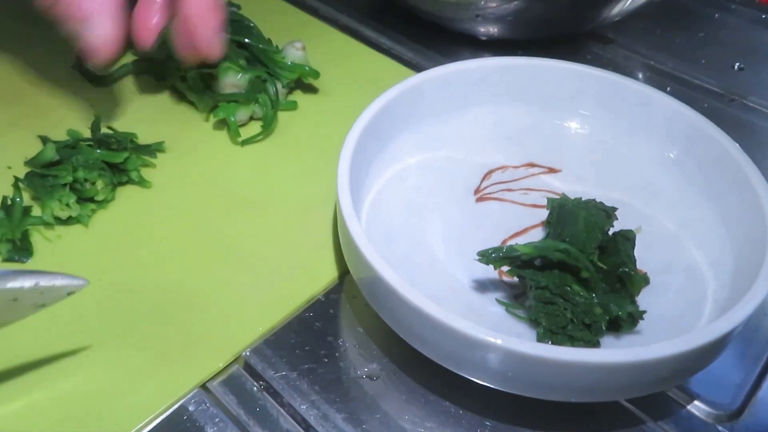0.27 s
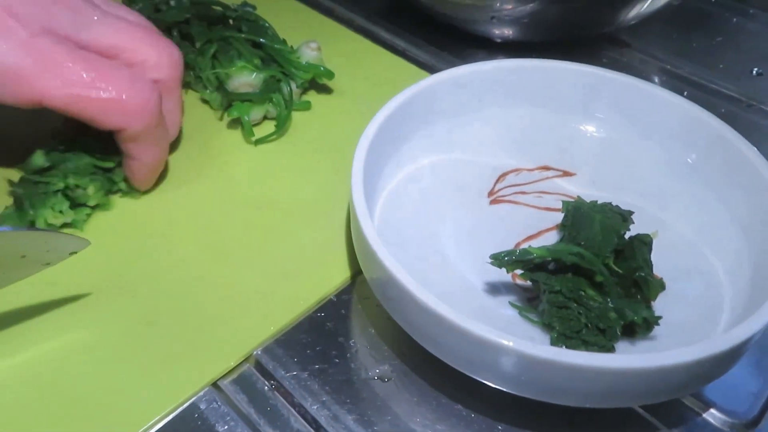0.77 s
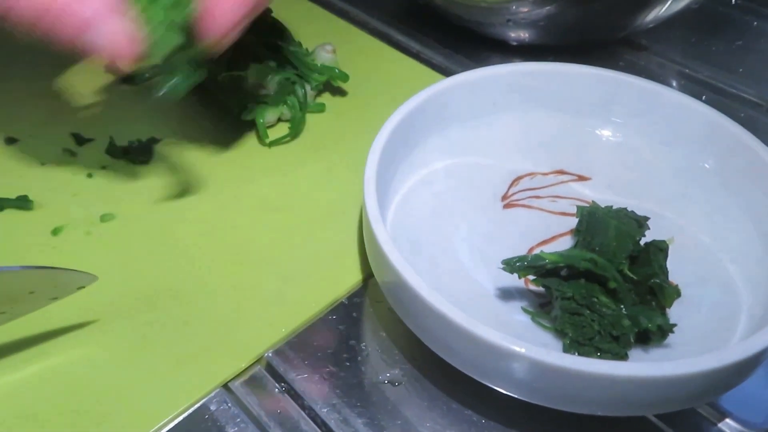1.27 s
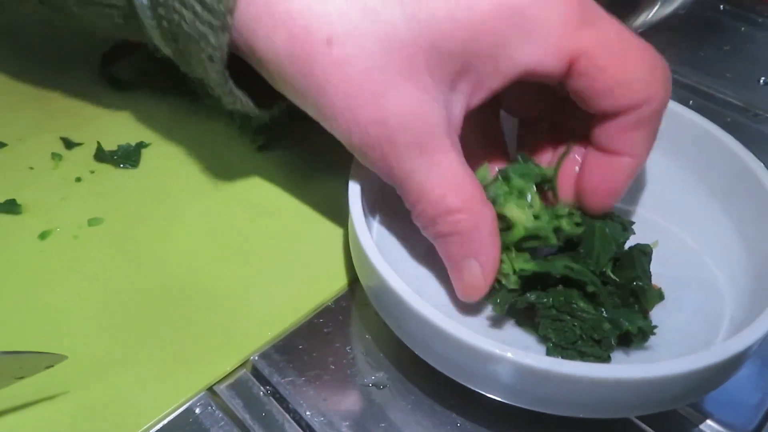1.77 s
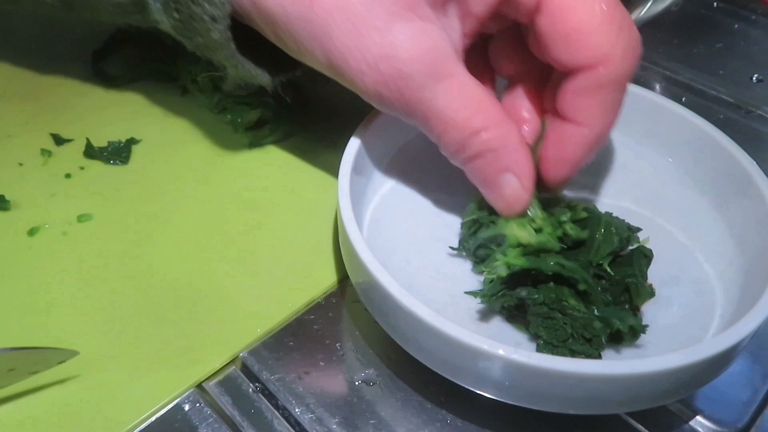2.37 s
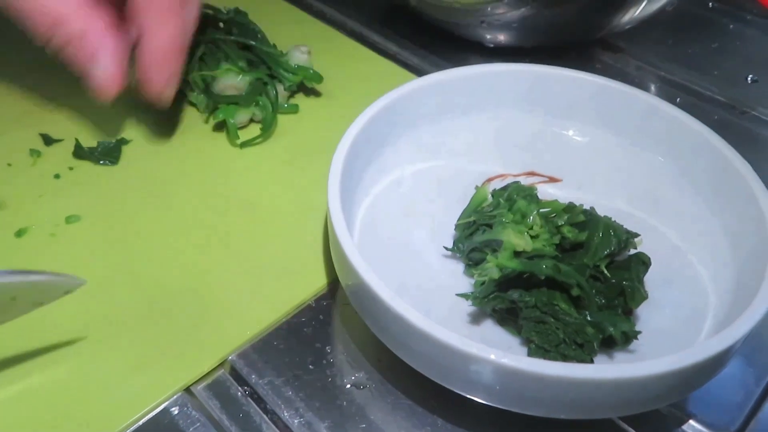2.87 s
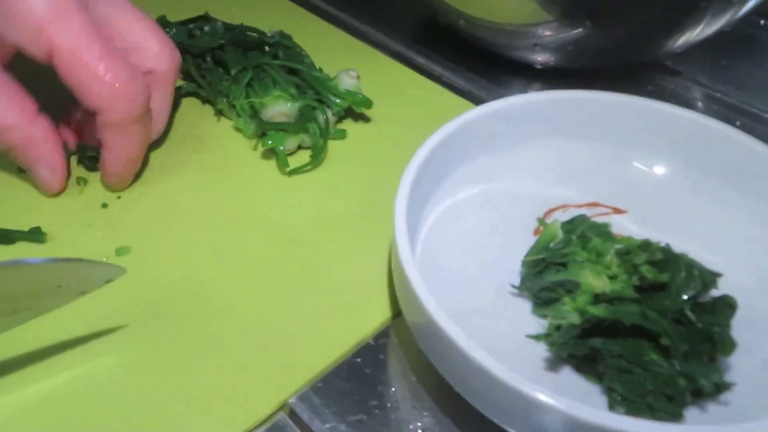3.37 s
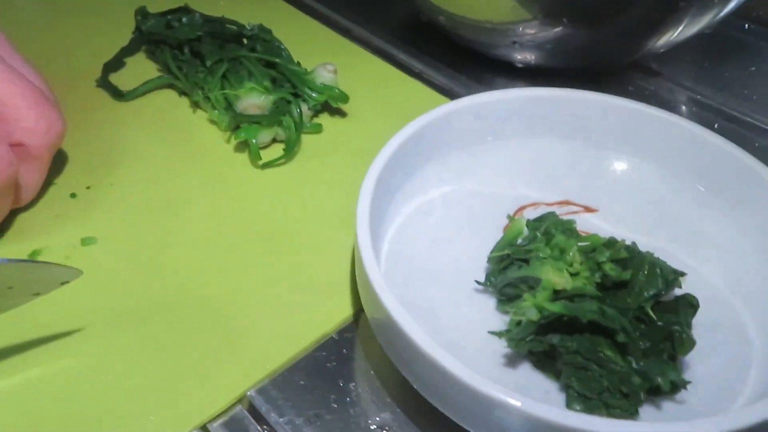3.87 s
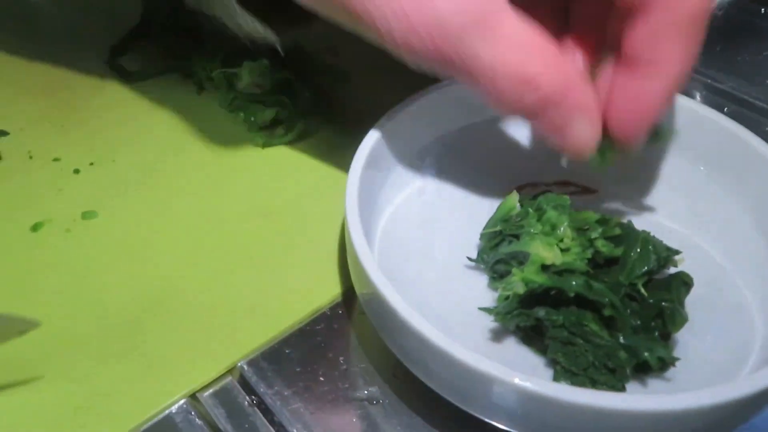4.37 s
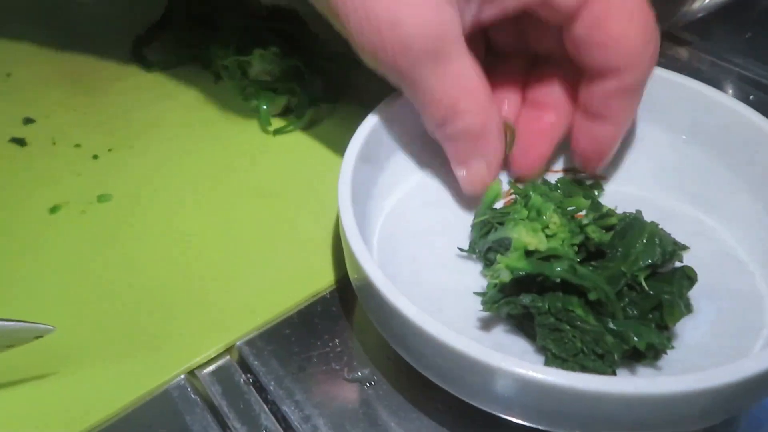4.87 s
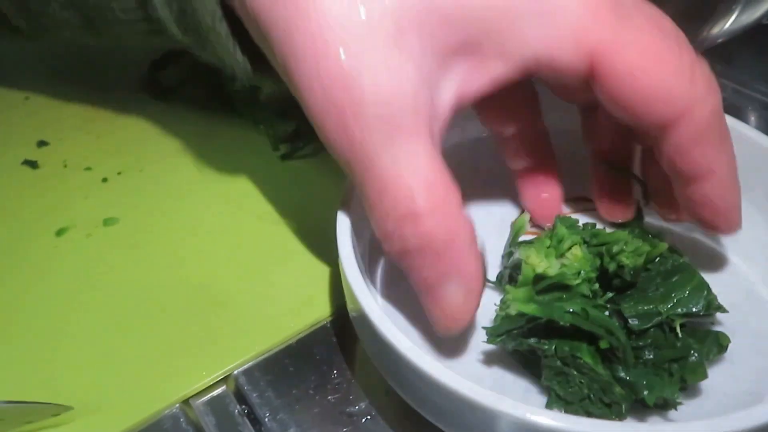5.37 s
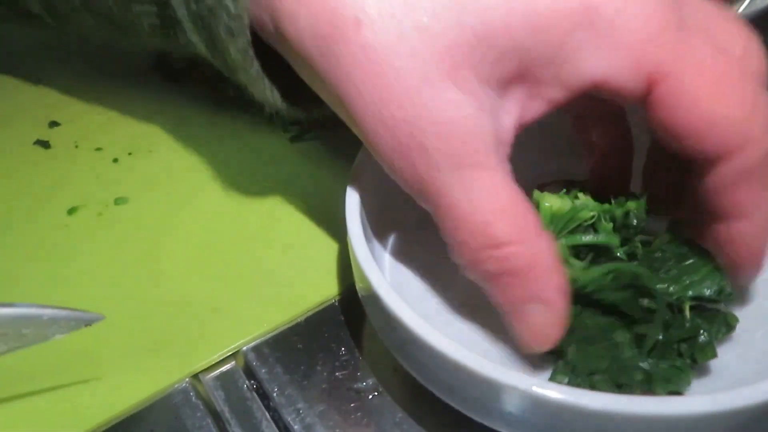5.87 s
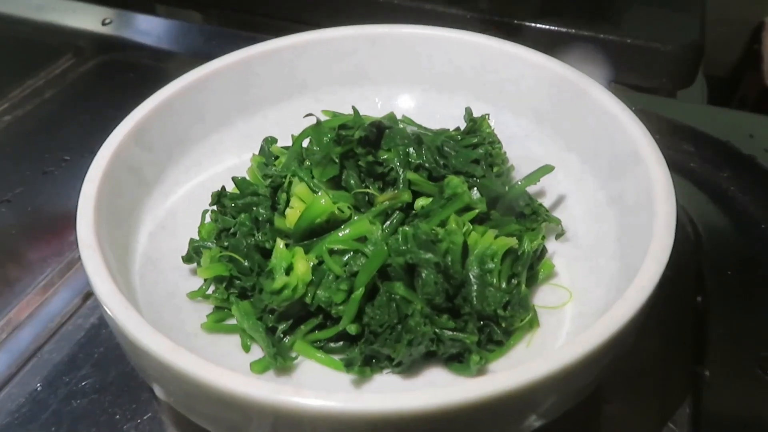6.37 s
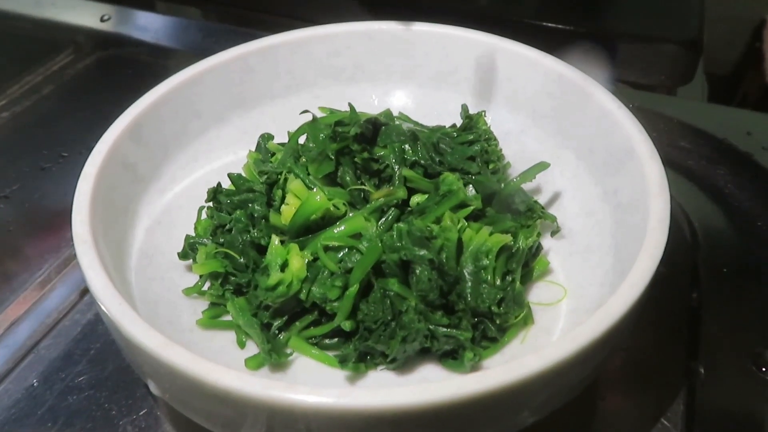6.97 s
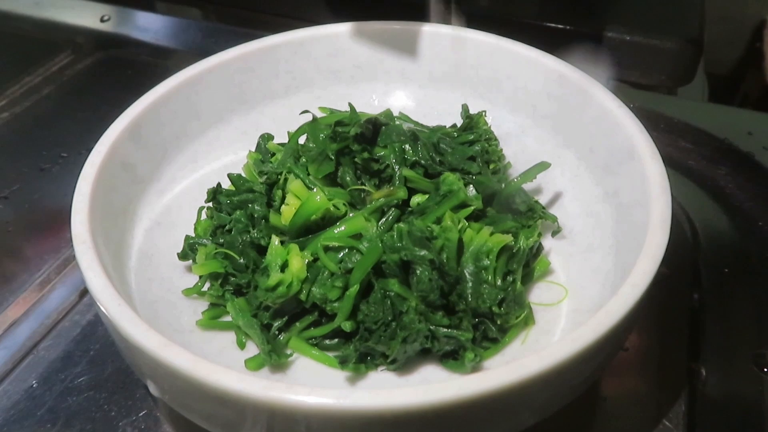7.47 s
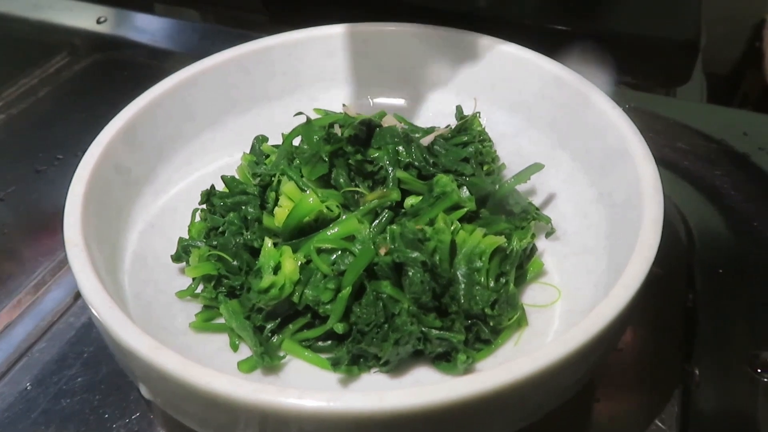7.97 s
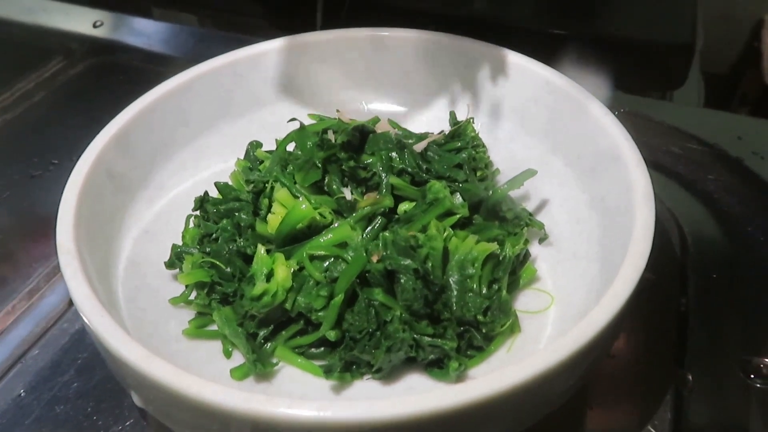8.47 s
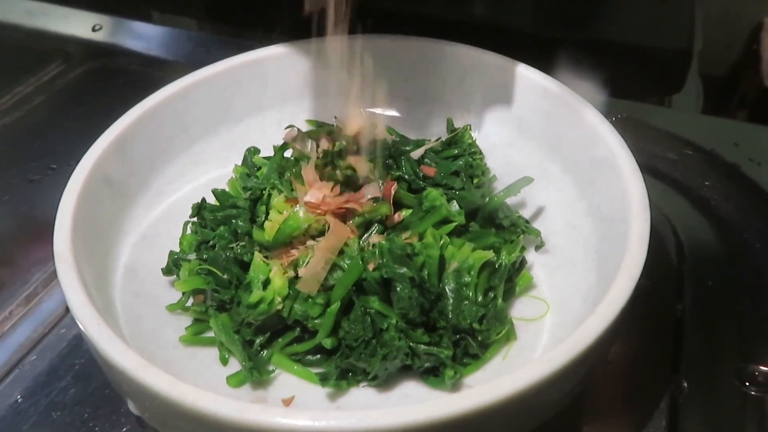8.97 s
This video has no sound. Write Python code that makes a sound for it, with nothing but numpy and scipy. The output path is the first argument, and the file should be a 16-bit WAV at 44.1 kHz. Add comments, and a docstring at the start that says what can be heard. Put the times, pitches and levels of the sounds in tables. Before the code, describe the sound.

In a quiet humming kitchen, soft low thuds and a bowl clunk give way to constant crisp plastic crackle and faint rustling of dry flakes.

```python
"""A hand thumps and drags over a cutting board on a steel kitchen counter, and knocks a ceramic bowl.
Thumps and knocks are dying sines at the pitches of the struck things; drags are dense random jolts.
Then a small plastic bag of dried flakes is crinkled and shaken: cracks of noise ring the film,
over rustling grains and a low rumble. Faint ticks and whistles are sines; echoes are random taps.
A quiet room hiss, made of random spectra, and a low mains hum, a sine, lie under everything."""
import sys
import numpy as np
from scipy import signal
from scipy.fft import rfft, irfft
from scipy.io import wavfile
from scipy.ndimage import uniform_filter1d

SR = 44100
rng = np.random.default_rng(int(sys.argv[2]) if len(sys.argv) > 2 else 0)


def store_wav(level_fs):
    """Save 16-bit WAV to argv[1]."""
    pcm = np.round(np.clip(np.atleast_2d(level_fs), -1, 1) * 32767)
    wavfile.write(sys.argv[1], SR, pcm.T.astype(np.int16))


N = 406602  # length in samples

# ways the board and counter ring: pitch_hz, level_db, t60_s (time to fall by 60 dB)
COUNTER_MODES = [(108.8, 4, 0.16), (168, 0, 0.061), (202.5, -1, 0.14), (257.8, -3, 0.082),
                 (322.3, -8.5, 0.21), (382.3, -0.5, 0.074), (473, -2, 0.042), (532, -11.5, 0.13),
                 (804, -14, 0.19), (867, -22.5, 0.2), (1103, -20.5, 0.041), (1780, -11, 0.11)]
# creases of the bag snapping: start_s, level_db, low_ring_hz, low_ring_db, high_ring_hz, high_ring_db,
# treble_db (ring levels are relative to each other)
CREASE_SNAPS = [(6.088, -17, 2310, -11.5, 5500, -11, -36), (6.135, -33.5, 3200, -6, 3710, -19, -30),
                (6.179, -24, 3050, -14.5, 4500, -9, -26), (6.295, -28.5, 2180, -7, 4950, -14, -51),
                (6.309, -35, 620, -5, 5480, -16, -43), (6.322, -29, 1920, 5, 4820, -12, -20),
                (6.334, -18, 2170, -20.5, 5610, -7, -26), (6.479, -21, 2030, -13, 4660, -11, -29),
                (6.516, -26, 1830, -13, 3540, -13, -39), (6.538, -22.5, 790, 3, 3540, -13, -39),
                (6.561, -20.5, 600, -11.5, 6820, -7.5, -47), (6.714, -27, 690, 2, 3800, -12, -37),
                (6.743, -20, 3100, -10, 3760, -15, -40), (6.801, -16.5, 3300, -17.5, 5700, -13.5, -21),
                (6.848, -17, 1600, -18.5, 4960, -15, -25), (6.923, -21, 664, -12, 5250, -14, -25),
                (7.1, -22.5, 2150, -18, 4240, -8, -30), (7.122, -16.5, 3370, -20.5, 6010, -18, -19.5),
                (7.148, -25.5, 1800, -20, 3800, -13, -18), (7.175, -27.5, 830, -20, 5110, -9, -27),
                (7.277, -23, 3270, -14.5, 4460, -11, -29), (7.289, -20, 710, -15.5, 3900, -13.5, -35),
                (7.366, -31, 2420, -13, 4840, -15, -33), (7.432, -18.5, 1300, -13.5, 6100, -13.5, -26),
                (7.445, -26, 3080, -15, 4450, -19, -38), (7.504, -17, 2960, -23, 6900, -11, -32),
                (7.564, -23, 2340, -10, 4730, -13, -32), (7.584, -22.5, 2370, -14, 4340, -11, -33),
                (7.763, -23, 680, -9, 5200, -5, -27), (7.801, -15, 2660, -14.5, 4240, -10.5, -18),
                (7.897, -28.5, 3100, -18, 4300, -19, -21), (7.959, -19, 2670, -13, 4500, -9, -42),
                (8.058, -25.5, 1800, -14, 6490, -3, -39), (8.074, -24.5, 2520, -14, 4400, -15, -36),
                (8.157, -14, 3070, -21, 6350, -12.5, -35), (8.282, -28, 1970, -8, 3540, -13, -33),
                (8.289, -23, 770, -11, 4450, -15, -34), (8.297, -27, 2420, -6, 4290, -25, -35),
                (8.618, -20.5, 2550, -8, 6650, -15.5, -41), (8.631, -20, 2490, -13, 4520, -17, -28),
                (8.68, -22, 2900, -11.5, 6150, -13, -38), (8.843, -17, 2500, -14, 4300, -16, -35),
                (8.883, -17.5, 3120, -15, 5600, -17, -38), (8.906, -25, 2310, -11, 4630, -10, -32),
                (8.912, -8, 2100, -11.5, 4630, -12.5, -19.5), (9.059, -19, 1830, -13, 4740, -13, -23)]


def amp(db):
    """Turns decibels into a plain multiplier."""
    return 10 ** (np.asarray(db) / 20)


def evened(x):
    """Scales a signal to an rms (average strength) of 1."""
    return x / np.sqrt(np.mean(x ** 2) + 1e-20)


def read(points, hz):
    """Reads a table of (hz, value) at any pitch, in straight lines over log pitch."""
    f, value = np.transpose(points)
    return np.interp(np.log(hz + 1), np.log(f + 1), value)


def add(mix, start_s, sound):
    """Adds a sound into the mix from its start time, cut off at the end of the mix."""
    part = mix[..., round(start_s * SR):][..., :sound.shape[-1]]
    part += sound[..., :part.shape[-1]]


def coloured(x, spectrum):
    """Weights the pitches in x by the spectrum, then sets the rms to 1."""
    hz = np.fft.rfftfreq(x.shape[-1], 1 / SR)
    return evened(irfft(rfft(x) * amp(read(spectrum, hz)), x.shape[-1]))


def ring(hz, db, t60, count):
    """A struck thing rings as a sum of dying sines."""
    t = np.arange(count) / SR
    fading = amp(np.c_[db] - 60 * t / np.c_[t60])
    return (fading * np.sin(2 * np.pi * np.c_[hz] * t)).sum(0)


def grains(per_s, spread_db):
    """Sparse clicks of random sign and size, at rms 1."""
    size = amp(spread_db * np.minimum(rng.exponential(1, N), 4))
    size = size * rng.choice([-1., 1.], N)
    return evened(size * (rng.random(N) < per_s / SR))


def room_hiss():
    """Random short-time spectra make a steady hiss; faint drifting patches vary its colour."""
    # hiss spectrum: pitch_hz, relative level_db per Hz
    hiss_colour = [(25, -29), (40, -4.5), (64, 0.5), (80, -5.5), (120, -5), (200, -4), (400, -5.5),
                   (630, -13), (1000, -15), (2500, -21.5), (5000, -27.5), (10000, -36), (14500, -40.5),
                   (16000, -57)]
    # how alike left and right are: pitch_hz, likeness (1 = the same)
    likeness = [(60, 1), (180, 0.69), (550, 0.083), (1650, 0.16), (4970, 0.52), (15000, 0.17)]
    frames, hz = N // 512 + 5, np.fft.rfftfreq(2048, 1 / SR)
    a, b, c, d, patches = rng.standard_normal((frames, 1025, 5)).T
    patches = uniform_filter1d(patches, 24, 0)  # smooth over pitch
    patches = evened(uniform_filter1d(patches, 8, 1))  # smooth over time
    same = np.clip(read(likeness, hz), -1, 1)[:, None]
    left = a + 1j * b
    right = same * left + np.sqrt(1 - same ** 2) * (c + 1j * d)
    spectra = np.array([left, right]) * amp(read(hiss_colour, hz)[:, None] + 1.22 * patches)
    hiss = signal.istft(spectra, nperseg=2048, noverlap=1536)[1][:, :N]
    return amp(-48.5) * evened(hiss)


def mains_hum():
    """One low sine whose level wavers slowly."""
    hum_hz, hum_db, waver_db = 49.4, -46.5, 1.3
    waver = uniform_filter1d(rng.standard_normal(N), 3000)
    waver = evened(uniform_filter1d(waver, 3000))
    return amp(hum_db + waver_db * waver) * np.sin(2 * np.pi * hum_hz * np.arange(N) / SR)


def blows():
    """A soft push rings the counter modes near the favoured pitch; the contact itself clacks."""
    # blows on the counter: start_s, body_peak_db, favoured_hz, clack_db (relative to the body)
    hits = [(0.6, -6, 185, -28), (0.917, -21.5, 206, -22.5), (0.99, -22, 181, -35), (1.866, -42, 91.5, -33),
            (3.039, -3.5, 202, -22.5), (3.165, -13.5, 247, -41), (3.427, -10.5, 180, -21.5),
            (3.507, -20, 187, -19.5), (3.722, -24, 129, -26), (3.783, -21, 360, -15),
            (3.812, -16.5, 380, -23), (3.881, -24, 108, -25), (5.018, -34, 80, -38), (5.389, -13, 305, -7),
            (5.477, -40, 80, -25)]
    # clack spectrum: pitch_hz, relative level_db per Hz
    clack_colour = [(350, -19), (600, 0.5), (855, -10.5), (993, -5.5), (3240, -20), (3660, -22),
                    (5290, -29.5), (15500, -73)]
    push_s, clack_rise_s = 0.0019, 0.000094  # clack rise is for a 0 dB clack; weaker ones rise more slowly
    hz, db, t60 = np.transpose(COUNTER_MODES)
    out, t = np.zeros(N), np.arange(20000) / SR
    noises = rng.standard_normal((len(hits), 20000))
    sign = (-1.) ** np.arange(len(hz))  # signs alternate so that the modes do not all start in one spike
    # the clack dies in a middle, a long faint and a very short stage
    clack_fade = amp(-60 * t / 0.096) + amp(-25.5 - 60 * t / 0.99) + amp(-0.5 - 60 * t / 0.0063)
    for (start_s, peak_db, favoured_hz, clack_db), noise in zip(hits, noises):
        octaves_above = np.log2(hz / favoured_hz)
        level = sign * amp(db - np.maximum(8 * octaves_above, -13 * octaves_above))
        body = sum(g * ring([f], [0], [d], count=20000) for f, g, d in zip(hz, level, t60))
        body = body * (1 - np.exp(-t / push_s))
        rise = np.minimum(t / clack_rise_s * amp(clack_db), 1)
        clack = coloured(noise, clack_colour) * clack_fade * rise
        add(out, start_s, amp(peak_db) * (body / abs(body).max() + amp(clack_db) * clack))
    return out


def kitchen(x):
    """The room's echoes: sparse taps of random sign, each band dying at its own speed."""
    # how long echoes last: pitch_hz, t60_s
    echo_time = [(150, 0.43), (600, 0.3), (2000, 0.22), (5000, 0.078), (12000, 0.17)]
    taps = np.zeros((2, SR // 2))
    at = np.arange(120, SR // 2 - 20, 20)
    at = at + rng.integers(0, 20, (2, len(at)))
    np.put_along_axis(taps, at, rng.choice([-1., 1.], at.shape), 1)
    taps = taps + 7.9 * taps[:1]  # the two microphones sit close together and hear much the same echoes
    hz, t, spectra = signal.stft(taps, SR, nperseg=256)
    fading = amp(-60 * t / read(echo_time, hz)[:, None])
    tail = signal.istft(spectra * fading, SR, nperseg=256)[1]
    return signal.fftconvolve(x[None], tail / np.linalg.norm(tail[0]), axes=1)[:, :N]


def drags():
    """Skin sticks and slips: dense jolts shake the counter, finer ones are heard as grit."""
    # drags of the hand: touch_s, bite_s (when the skin bites), lift_s, push_db, grit_db (at the bite)
    strokes = [(0.628, 0.744, 0.815, -26.5, -35), (0.85, 1.01, 1.065, -33, -46),
               (3.052, 3.103, 3.185, -26, -30), (3.444, 3.497, 3.53, -29.5, -40),
               (3.786, 3.805, 3.845, -29, -39)]
    # grit spectrum: pitch_hz, relative level_db per Hz
    grit_colour = [(350, -6.5), (600, -3.5), (1110, -7.5), (1280, -6.5), (1440, -16), (1860, -15),
                   (3400, -22), (4800, -31.5), (7000, -44), (15000, -54)]
    # grit swells until the bite, then sags; everything dies as the hand lifts
    swell_db_per_s, sag_db_per_s, lift_db_per_s = 515, 99, 437
    favoured_hz = 197
    t, push, grit = np.arange(N) / SR, np.zeros(N), np.zeros(N)
    for touch_s, bite_s, lift_s, push_db, grit_db in strokes:
        on = (t > touch_s) * amp(-lift_db_per_s * np.maximum(t - lift_s, 0))
        push += on * amp(push_db)
        grit += on * amp(grit_db - np.maximum(swell_db_per_s * (bite_s - t), sag_db_per_s * (t - bite_s)))
    hz, db, t60 = np.transpose(COUNTER_MODES)
    octaves_above = np.log2(hz / favoured_hz)
    body = ring(hz, db - np.maximum(6 * octaves_above, -13 * octaves_above), t60, count=20000)
    jolts = uniform_filter1d(push, 200) * grains(3000, spread_db=-0.9)
    shaken = signal.oaconvolve(jolts, body / np.linalg.norm(body))[:N]
    return shaken + uniform_filter1d(grit, 200) * coloured(grains(6000, spread_db=2.5), grit_colour)


def ticks():
    """Faint bright ticks, each four short dying sines."""
    # ticks: start_s, level_db (each sine lies a few dB below)
    times = [(0.85, -44), (1.5429, -49), (2.4104, -51)]
    out = np.zeros(N)
    for start_s, db in times:
        levels_db = db - np.array([7.2, 4.2, 3.1, 7])
        add(out, start_s, ring([7000, 9600, 11800, 14500], levels_db, [.004] * 4, count=400))
    return out


def whistles():
    """Thin faint whistles: gliding sines that fade in and out."""
    # whistles: start_s, end_s, start_hz, end_hz, peak_db
    glides = [(2.83, 3.032, 4650, 4560, -68), (3.62, 3.96, 4070, 3930, -63.5),
              (4.33, 4.48, 7750, 7950, -70), (4.9, 5.12, 4600, 4550, -71)]
    out = np.zeros(N)
    for start_s, end_s, from_hz, to_hz, db in glides:
        hz = np.linspace(from_hz, to_hz, round((end_s - start_s) * SR))
        hz = hz + 12 * evened(uniform_filter1d(rng.standard_normal(len(hz)), 600))  # the pitch wavers
        tone = np.sin(2 * np.pi * np.cumsum(hz) / SR)
        add(out, start_s, amp(db) * tone * signal.windows.tukey(len(hz), .5))
    return out


def knocks():
    """A knuckle rings the bowl, most strongly near the pitch it favours."""
    # ways the bowl on the counter rings: pitch_hz, level_db, t60_s
    bowl_modes = [(323, -1, 0.12), (475, -4, 0.1), (590, -12, 0.06), (843, 3, 0.065), (1400, 9, 0.029),
                  (1806, 6, 0.035), (2295, 3, 0.051), (2720, -5, 0.055)]
    # knocks: start_s, peak_db, pitch_share (a bowl held down rings lower), favoured_hz
    hits = [(3.7815, -20, 0.88, 1150), (5.3883, -8, 1, 470)]
    hz, db, t60 = np.transpose(bowl_modes)
    out = np.zeros(N)
    for start_s, peak_db, share, favoured_hz in hits:
        level_db = db - 6 * abs(np.log2(share * hz / favoured_hz))
        sound = ring(share * hz, level_db, t60, count=8000)
        add(out, start_s, amp(peak_db) * sound / abs(sound).max())
    return out


def rumble():
    """A low rumble under the handling of the bag: noise with a few broad low peaks."""
    # rumble peaks: pitch_hz, width_hz, level_db (relative)
    peaks = [(73.5, 40, -9.5), (113.6, 22, 3), (143, 28, -8), (218.7, 62, -10.5)]
    # rumble loudness over time: time_s, level_db
    loudness = [(6.04, -56), (6.1, -49.5), (6.95, -46.5), (7.05, -36.5), (7.3, -43), (9.22, -47)]
    t, hz = np.arange(N) / SR, np.fft.rfftfreq(N, 1 / SR)
    shape = sum(amp(db) / (1 + ((hz - f) / width * 2) ** 2) for f, width, db in peaks)
    noise = evened(irfft(rfft(rng.standard_normal(N)) * shape, N))
    return noise * amp(np.interp(t, *np.transpose(loudness), -200))  # silent before the first point


def swells(rows):
    """A loudness curve with a smooth bump for each (middle_s, length_s, level_db)."""
    t = np.arange(N) / SR
    steps = t[::64]
    bumps = sum(amp(db) * np.exp(-((steps - s) / length) ** 2) for s, length, db in rows)
    return np.interp(t, steps, bumps)


def handling():
    """Tiny creases rustle and crack around every snap; the flakes hiss as they slide."""
    # flakes sliding in the bag: middle_s, length_s, level_db
    slides = [(7.874, 0.017, -51), (8.327, 0.017, -71), (7.354, 0.023, -49), (8.387, 0.058, -46.5),
              (8.539, 0.027, -54), (8.801, 0.033, -47.5)]
    # spectra of rustle, cracks and sliding flakes: pitch_hz, relative level_db per Hz
    rustle_colour, crack_colour, slide_colour = [(410, -23), (1000, -3), (3840, 3), (6230, -1),
                                                 (11000, -13), (16000, -26)], [(500, -33), (1500, 8.5), (3000, 0),
                                                                 (7000, -8), (16000, -30)], [(1200, 0.5), (3000, -1),
                                                                                  (6300, -1), (9000, -8),
                                                                                  (16000, -22)]
    lag_s, length_s, full_snap_db = 0.011, 0.047, -53  # rustle about a 0 dB snap
    follows = 0.25  # share of the snap's dB that the rustle follows
    creasing = swells([(s + lag_s, length_s, full_snap_db + follows * db) for s, db, *_ in CREASE_SNAPS])
    sliding = swells(slides)
    fine, other = (coloured(grains(6000, spread_db=8.0), rustle_colour) for _ in range(2))
    rustle = np.array([fine + 0.9 * other, fine - 0.38 * other]) * 0.57 * creasing
    cracks = signal.lfilter([1], [1, -.97], grains(160, spread_db=4.0))  # each lasts a millisecond or two
    cracks = coloured(cracks * rng.standard_normal(N), crack_colour)
    coarse = cracks * (0.85 * creasing + 0.25 * sliding)
    hiss, apart = (coloured(grains(9000, spread_db=4.5), slide_colour) for _ in range(2))
    flakes = np.array([hiss + 0.3 * apart, hiss - 0.25 * apart]) * sliding
    return rustle + coarse + flakes


def snaps():
    """A crease gives way in a quick crack or two, ringing narrow bands of the film, with a fizzy tail."""
    t60_s = 0.0063  # of a ring at 3000 Hz; higher ones die faster
    out, t = np.zeros((2, N)), np.arange(1200) / SR
    noises = rng.standard_normal((len(CREASE_SNAPS), 3, 1200))
    chances = rng.random((len(CREASE_SNAPS), 8))
    one_crack = amp(-60 * t / 0.0013) + amp(-13.5 - 60 * t / 0.012)
    tail_fade = amp(-10 - 60 * t / 0.012) + amp(-26.5 - 60 * t / 0.037)
    tail_fade = tail_fade * (1 - np.exp(-t / 0.0001))
    for row, noise, chance in zip(CREASE_SNAPS, noises, chances):
        start_s, db, low_hz, low_db, high_hz, high_db, treble_db = row
        # the film also rings at a few chance pitches
        middle_hz = 862 * (7610 / 862) ** chance[:3]
        treble_hz = np.interp(chance[3:6], [0, 1], [7700, 13360])
        colour = [(300, low_db - 9.5), (low_hz, low_db), (high_hz, high_db),
                  (11000, treble_db + 2.5), (16500, treble_db - 46)]
        hz = np.r_[low_hz, high_hz, middle_hz, treble_hz]
        level_db = np.r_[low_db, high_db, read(colour, middle_hz) - 7, np.full(3, treble_db - 3.5)]
        # a second crack follows, of chance strength and delay
        second = amp(-13 + 13.7 * chance[6]) * np.roll(one_crack, 70 + round(90 * chance[7]))
        crack = np.roll(one_crack, 30) + second
        rings = ring(hz, level_db, t60_s * (3000 / np.maximum(hz, 2000)) ** 0.89, count=1200)
        rings = rings * (1 - np.exp(-t / 0.000078))
        centre, apart = (signal.fftconvolve(n * crack, rings)[:1200] for n in noise[:2])
        tail = coloured(noise[2], [(f, 1.08 * d) for f, d in colour]) * tail_fade
        middle = centre / abs(centre).max() + tail
        apart_peak = abs(apart).max()
        # the microphones differ most in the treble, which the second difference brings out
        side = amp(-7.0) * np.diff(apart, 2, prepend=[0, 0]) / apart_peak + amp(-15) * apart / apart_peak
        add(out, start_s, amp(db) * np.array([middle + side, middle - side]))
    return out


def scene():
    """Adds up all the sounds, with kitchen echoes of the counter and the bag."""
    bag = snaps()
    too_small_for_bass = signal.butter(3, 75, "highpass", fs=SR, output="sos")  # radiates no deep bass
    counter = signal.sosfilt(too_small_for_bass, blows() + knocks() + drags())
    echoes = kitchen(amp(-10) * counter + amp(-14.5) * bag.mean(0))
    faint = ticks() + whistles() + room_hiss() + mains_hum()
    return counter + bag + echoes + handling() + rumble() + faint


def record(dry):
    """The camera microphone cuts the deep bass; then a low-pass cuts the highest treble."""
    thin = signal.sosfilt(signal.butter(2, 45, "highpass", fs=SR, output="sos"), dry)
    low_pass = signal.firwin(511, 16000, window=("kaiser", 9), fs=SR)  # edge at 16000 Hz
    return signal.oaconvolve(thin, low_pass[None], "same")


dry = scene()
out = record(dry)
store_wav(out)
```